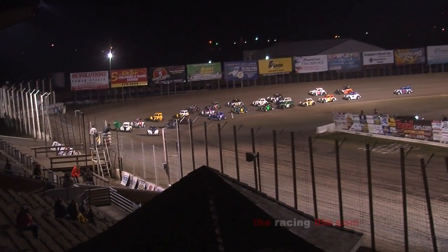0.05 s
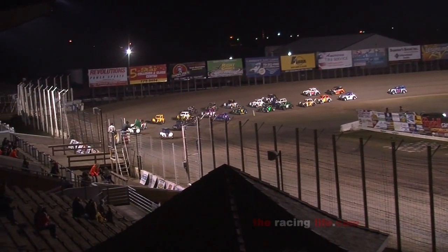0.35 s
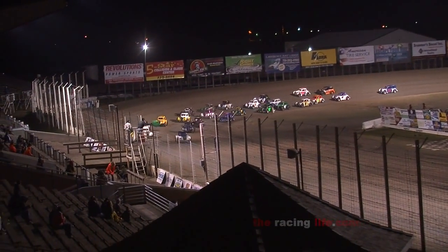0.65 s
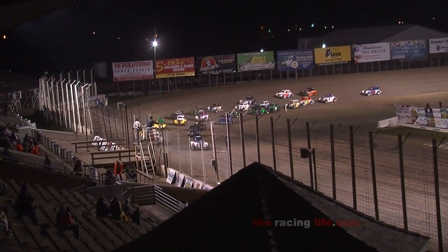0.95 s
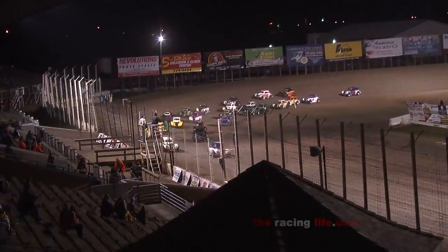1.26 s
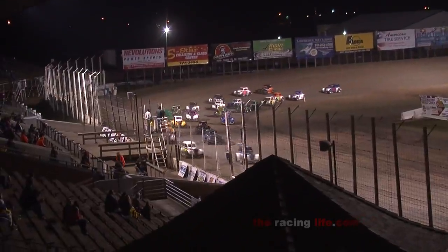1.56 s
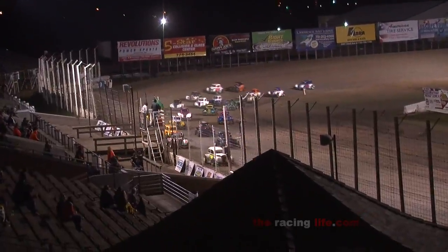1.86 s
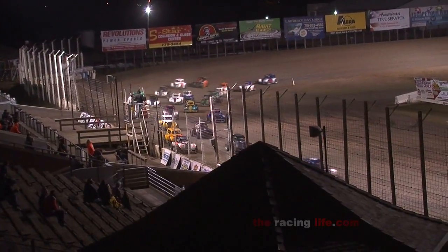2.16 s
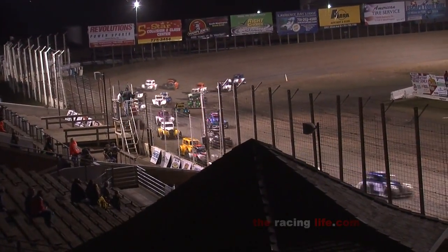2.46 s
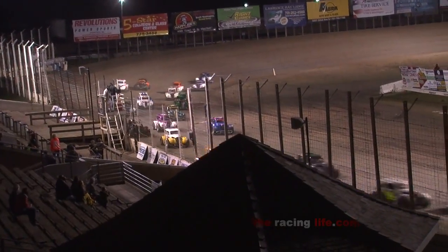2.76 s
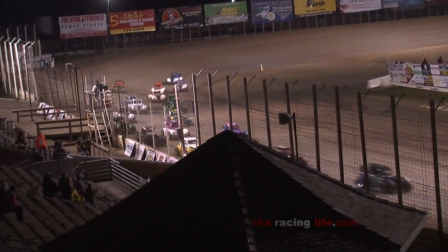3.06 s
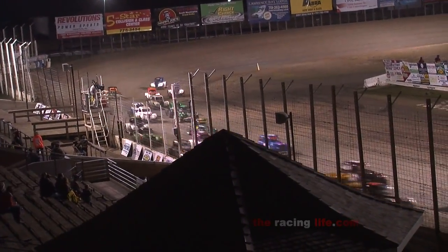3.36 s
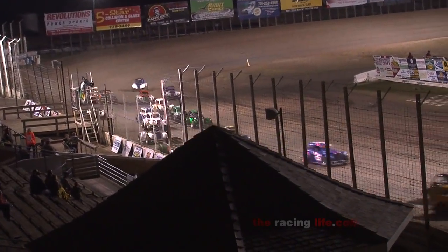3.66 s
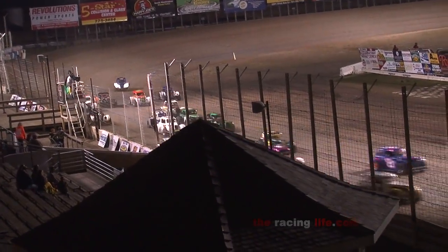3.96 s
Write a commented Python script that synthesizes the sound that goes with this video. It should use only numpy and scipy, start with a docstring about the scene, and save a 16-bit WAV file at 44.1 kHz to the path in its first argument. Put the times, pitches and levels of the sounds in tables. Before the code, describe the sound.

Race car engines roar together at a steady, loud level, heard from a grandstand. Their overlapping notes rise with the revs and drop as they pass close below, while the exhausts rasp, hiss and give a few short barks.

```python
"""A loud drone of small four-cylinder race cars accelerating out of the turn of a dirt oval.
Each exhaust sounds a harmonic series that climbs with the revs, then sinks as the car goes by.
The grandstand echoes, cars right below it blare, and the rest of the field merges into a roar.
Turbulent gas rasps and hisses over the drone, and an exhaust barks three times.
A limiter holds the din at one level and shaves its peaks."""
import sys
import numpy as np
from scipy import signal
from scipy.fft import rfft, irfft, next_fast_len
from scipy.io import wavfile
from scipy.ndimage import uniform_filter1d, map_coordinates

SR = 44100
rng = np.random.default_rng(int(sys.argv[2]) if len(sys.argv) > 2 else 0)


def bounce(signal):
    """Save signal as a 16-bit WAV file at the path given by the first command-line argument."""
    frames = np.transpose(np.atleast_2d(signal))
    limited = np.clip(frames, -1, 1)
    pcm = np.round(limited * 32767).astype(np.int16)
    wavfile.write(sys.argv[1], SR, pcm)


N = 176400
TIME_S = np.arange(N) / SR


def amp(db):
    """Decibels as an amplitude ratio."""
    return 10 ** (np.asarray(db) / 20)


def along(points, hz):
    """Interpolation of (frequency_hz, value) points on a logarithmic frequency axis."""
    point_hz, values = np.transpose(points)
    return np.interp(np.log(hz + 1), np.log(point_hz + 1), values)


def curves(rows):
    """Linear interpolation in time: one curve for each column after the first."""
    time_s, *columns = np.transpose(rows)
    return [np.interp(TIME_S, time_s, column) for column in columns]


def wobble(rate_hz):
    """Smooth random modulation: a spline through rate_hz random knots a second."""
    knots = rng.standard_normal(2048)
    at = np.arange(0, N + 64, 64)
    return np.interp(np.arange(N), at, map_coordinates(knots, [at * rate_hz / SR], mode="wrap"))


def filtered(x, response):
    """Linear filtering: the spectrum is multiplied by a frequency response."""
    size = next_fast_len(N + SR // 4)
    return irfft(rfft(x, size) * response(np.fft.rfftfreq(size, 1 / SR)), size)[:N]


def noise(spectrum, gate=1):
    """Spectral shaping: white noise is gated, coloured and scaled to rms 1."""
    x = filtered(gate * rng.standard_normal(N), lambda hz: amp(along(spectrum, hz)))
    return x / np.sqrt(np.mean(x ** 2) + 1e-20)


# Response of an exhaust pipe: frequency_hz, gain_db
PIPE_RESPONSE = [(60, -48.5), (125, -23.5), (185, -3), (240, 2.5), (305, 5), (390, 3), (550, -7), (800, -8),
                 (1500, -16.5), (3000, -30.5), (6000, -31.5), (10000, -65)]
CYLINDERS, PIPE_WIDTH_OCT = 4, 0.22
REV_WAVER, WALL_JITTER_CYCLES = .0048, .018


def engine(cycle_hz, lift_db, exhaust, flutter_db=1.5, wall_db=-8, size=2048):
    """Periodic firing drives a resonant pipe; the note interferes with its track-wall reflection."""
    even_db, odd_db, tilt_db, pipe_hz, resonance_db = exhaust
    cycles = np.cumsum(cycle_hz * (1 + REV_WAVER * wobble(45))) / SR + rng.random()
    order = np.arange(1, 48)
    firing = order % CYLINDERS == 0
    overtone = firing & (order > CYLINDERS)
    order_db = np.where(firing, 0, np.where(order % 2 == 0, even_db, odd_db))
    # The cylinders differ more towards the high orders, filling the gaps between firing harmonics.
    order_db = order_db / (1 + (order / 28) ** 2)
    order_db += tilt_db * np.log2(order / CYLINDERS)
    direct = amp(flutter_db * wobble(24)), cycles
    reflected = amp(wall_db) * wobble(21.993), cycles + WALL_JITTER_CYCLES * wobble(40)
    body, edge = np.zeros(N), np.zeros(N)
    for gain, phase in (direct, reflected):
        harmonics = amp(order_db) * np.exp(2j * np.pi * rng.random(len(order)))
        for part, chosen in ((body, ~overtone), (edge, overtone)):
            one_cycle = irfft(np.append(0, harmonics * chosen), size)
            part += gain * np.interp(phase % 1 * size, np.arange(size), one_cycle)
    peak_db = lambda hz: resonance_db * np.exp(-(np.log2((hz + 1) / pipe_hz) / PIPE_WIDTH_OCT) ** 2)
    pipe = lambda hz: amp(along(PIPE_RESPONSE, hz) + peak_db(hz))
    body, edge = filtered(body, pipe), filtered(edge, pipe)
    note = (body + amp(lift_db) * edge) / np.std(body + edge)
    puffs = (.5 + .5 * np.cos(2 * np.pi * CYLINDERS * cycles)) ** 3
    return note, puffs


# Each car's pass as heard, one list a car: time_s, cycle_hz, level_db, lift_db
# Directivity: the firing overtones lift as the pipe points at the listener.
CAR_PASSES = [
    [(0, 92.5, -31.5, 12.5), (.55, 97.5, -29.5, 4.5), (.87, 102.7, -26, 2.5), (1.2, 107.2, -30, 6),
     (1.5, 109, -38.5, -2), (1.72, 114, -30.5, 7), (1.95, 119, -30, 0.5), (2.35, 119, -31, 0.5),
     (2.55, 115, -38, -5), (4, 108, -39.5, 3)],
    [(0, 76, -30.5, -6.5), (.7, 80, -34, -10), (1.03, 83, -28.5, -2), (1.25, 85.5, -33, 2),
     (1.55, 82.2, -28.5, 3.5), (1.7, 82, -35, -4.5), (2, 84, -29.5, -1), (2.27, 85.2, -33, 10.5),
     (2.52, 87, -37.5, 7), (2.7, 86, -44, -2), (3.45, 83, -35.5, -8), (4, 81, -28, 1.5)],
    [(0, 63.3, -35, 6), (.3, 66.5, -26.5, 5.5), (.7, 68.5, -30.5, -1), (1.05, 70, -29.5, -0.5),
     (1.35, 72, -30.5, 7.5), (1.72, 75.2, -29, 4), (2, 78, -38, 0), (2.42, 81, -29, -3),
     (2.75, 78.5, -29.5, 3), (3, 74.6, -30, 5), (3.5, 68.5, -26, -2.5), (4, 61, -27.5, 1.5)],
    [(0, 70, -37, 9), (.3, 71.5, -28, -0.5), (.52, 72.5, -33, 4.5), (.62, 75.3, -32, 9), (.71, 81, -30, 0),
     (.8, 77.5, -28.5, 2), (1.05, 77, -31, -6), (1.33, 75.5, -23, -8), (1.5, 74.8, -30.5, -4),
     (2, 72.7, -25.5, -0.5), (2.27, 67.3, -32.5, 1), (2.75, 57, -27.5, 1), (3.15, 58.2, -24.5, -7.5),
     (3.3, 57, -31, 0.5), (4, 54, -33.5, -2.5)],
    [(0, 88, -34, -9), (1.1, 94.3, -37.5, 1), (1.4, 97.5, -32.5, 2.5), (1.75, 101.5, -31.5, -4),
     (2.05, 104.5, -25.5, 0), (2.45, 100, -32, -2), (2.8, 94.5, -41.5, 3), (3.5, 90, -42.5, 1.5)],
    [(0, 56, -41.5, -3), (2.2, 58, -34.5, -5.5), (2.6, 63.7, -29.5, -4.5), (2.85, 62.2, -27, 2.5),
     (3.2, 66, -37, 14), (3.4, 63, -29, 4), (3.65, 61, -33.5, 1.5), (4, 60, -35.5, 1)],
    [(0, 62.2, -36.5, -2), (.25, 67.5, -32.5, 4.5), (.5, 68, -35.5, 2.5), (.8, 71.2, -35.5, 4.5),
     (1.35, 78, -29.5, 0), (1.8, 80, -30.5, -2.5), (2.7, 74, -34, -4), (2.9, 74, -30.5, 2),
     (3.3, 77.8, -38.5, 4.5), (3.75, 77.6, -29.5, 1), (3.93, 77.2, -22.5, -5)],
]
# Each car's exhaust: even_orders_db, odd_orders_db, tilt_db_per_octave, pipe_hz, resonance_db
EXHAUST_TIMBRES = [(-2, -9, -1.5, 470, 6.5), (-11.5, -11.5, 0.5, 680, 3), (-7, -9, -1, 820, 2),
                   (-13.5, -15, -2, 305, 0.5), (-4.5, -6.5, 1, 320, -1), (-19, -21, -3.5, 510, 1.5),
                   (-15.5, -9.5, -0.5, 860, 5.5)]


def pack(throb_db=2, throb_hz=30):
    """Superposition: the near cars' notes add, throbbing irregularly; their puffs form a pulsing flow."""
    notes, flow = np.zeros(N), np.zeros(N)
    for rows, exhaust in zip(CAR_PASSES, EXHAUST_TIMBRES):
        cycle_hz, level_db, lift_db = curves(rows)
        note, puffs = engine(cycle_hz, lift_db, exhaust)
        notes += amp(level_db) * note
        flow += amp(level_db) ** 2 * puffs
    mean_flow = uniform_filter1d(flow, SR // 10)
    return notes * amp(throb_db * wobble(throb_hz)), np.sqrt(flow / mean_flow)


# Reverberation time of the grandstand: frequency_hz, t60_s
STAND_DECAY = [(150, 0.82), (1000, 0.47), (8000, 0.52)]


def grandstand_echo(notes):
    """Reverberation: dense reflections decay exponentially, faster in the treble than in the bass."""
    hz, time_s, spectra = signal.stft(rng.standard_normal(SR // 2), SR, nperseg=256)
    decay = amp(-60 * time_s / along(STAND_DECAY, hz)[:, None])
    _, tail = signal.istft(spectra * decay, SR, nperseg=256)
    return signal.fftconvolve(notes, tail / np.linalg.norm(tail))[:N]


# Envelope of the cars passing side-on: time_s, level_db
BLARE_ENVELOPE = [(0, -31.5), (1.8, -49), (2.3, -29.5), (2.8, -30), (3.3, -28.5), (4, -25.5)]
# Spectrum of their blare: frequency_hz, density_db
BLARE_SPECTRUM = [(60, -44), (150, -26.5), (235, 2.5), (300, 2.5), (380, -11.5), (500, -0.5), (600, -3),
                  (750, -12), (1200, -19), (3000, -33.5), (8000, -67.5)]


def blare():
    """Spectral smearing: right below the stand, the quick fall in pitch blurs notes into noise bands."""
    level_db, = curves(BLARE_ENVELOPE)
    return amp(level_db) * noise(BLARE_SPECTRUM)


# Spectrum of the distant cars: frequency_hz, density_db
ROAR_SPECTRUM = [(25, -31), (70, -33.5), (110, -23), (160, -17.5), (230, 0), (300, -2), (380, -7),
                 (520, -6.5), (750, -13.5), (1100, -15.5), (1600, -21), (2500, -30), (5000, -39),
                 (10000, -84)]


def roar(level_db=-26.5, swell_db=1):
    """Incoherent summation: the rest of the field, blurred by distance, merges into noise."""
    return amp(level_db + swell_db * wobble(8)) * noise(ROAR_SPECTRUM)


# Spectra of exhaust rasp and of the nearest cars' tyre and exhaust hiss: frequency_hz, density_db
RASP_SPECTRUM = [(200, -21.5), (700, 6.5), (1400, 10.5), (2200, 4.5), (3400, -2), (5000, -19.5),
                 (5800, -26.5), (7000, -43), (8800, -51.5), (10300, -61.5), (12300, -56), (15500, -70.5)]
HISS_SPECTRUM = [(1000, -33.5), (3000, 2.5), (4000, 2), (5000, -0.5), (5800, -6.5), (7000, -9.5),
                 (8800, -17.5), (9600, -23), (10400, -34), (11400, -38.5), (12400, -33.5), (13500, -45),
                 (16000, -49.5)]
# Their envelopes: time_s, relative_level_db
RASP_ENVELOPE = [(0, 2), (.3, 1), (.45, 1), (.58, -3), (.73, -2), (.77, 3), (.82, -1.5), (.93, -4),
                 (1, -1.5), (1.35, 1), (1.45, -1.5), (1.52, 3.5), (1.87, 3), (1.9, -3), (1.96, 0),
                 (2.32, 2), (2.35, -1.5), (2.75, -3), (3.05, 1), (3.25, -1), (3.31, 1.5), (3.55, -1),
                 (3.72, 1), (4, 2.5)]
HISS_ENVELOPE = [(0, -64), (.7, -63.5), (.78, -61), (1.45, -59), (1.48, -53.5), (1.875, -52.5),
                 (1.895, -57), (1.935, -57), (1.95, -54.5), (2.325, -53), (2.34, -59), (2.75, -59),
                 (3.25, -57.5), (3.32, -55.5), (3.55, -56.5), (3.75, -55), (4, -52)]


def rasp_and_hiss(flow, rasp_db=-34, hiss_db=10, flicker_db=.9, chop_depth=0.47):
    """Amplitude modulation: the firings partly chop the noise of turbulent gas and a brighter hiss."""
    rasp_swell_db, = curves(RASP_ENVELOPE)
    hiss_swell_db, = curves(HISS_ENVELOPE)
    gate = 1 + chop_depth * (flow - 1)
    rasp = amp(rasp_db + rasp_swell_db) * noise(RASP_SPECTRUM, gate)
    hiss = amp(hiss_db + hiss_swell_db) * noise(HISS_SPECTRUM, gate)
    return (rasp + hiss) * amp(flicker_db * wobble(45))


# Sharp barks from an exhaust: start_s, length_s, level_db
BARK_EVENTS = [(.628, .012, -38), (3.348, .018, -32), (3.815, .02, -35)]
# Their spectrum: frequency_hz, density_db
BARK_SPECTRUM = [(300, -9), (1200, 4.5), (3500, -6), (5000, -15), (8500, -26.5), (10500, -43),
                 (16000, -56.5)]


def barks(attack_s=0.0028, release_s=0.0082):
    """Broadband transients: each burst of hot gas rises quickly, holds and decays exponentially."""
    envelope = np.zeros(N)
    for start_s, length_s, level_db in BARK_EVENTS:
        rise = np.clip((TIME_S - start_s) / attack_s, 0, 1)
        fall = np.exp(-np.maximum(TIME_S - start_s - length_s, 0) / release_s)
        envelope += amp(level_db) * rise * fall
    return envelope * noise(BARK_SPECTRUM)


# Brief surges (+) and dips (-) of the drone: centre_s, change_db
DRONE_SWINGS = [(.93, -5), (1.335, 4), (1.37, -4), (1.41, 4), (1.45, -8), (1.64, -5), (1.78, -4),
                (1.905, -6), (3.16, 4), (3.25, -8), (3.855, -5)]


def swings(half_width_s=.018):
    """Gain modulation: the drone's level surges or dips along short Gaussian curves."""
    return amp(sum(change_db * np.exp(-((TIME_S - centre_s) / half_width_s) ** 2)
                   for centre_s, change_db in DRONE_SWINGS))


def scene(echo_db=-5.5):
    """Superposition: near cars, echo, blare and roar form the drone, with rasp and barks over it."""
    notes, flow = pack()
    drone = notes + amp(echo_db) * grandstand_echo(notes) + blare() + roar()
    return (swings() * drone + rasp_and_hiss(flow) + barks())[None]


def record(dry, drive_db=-1.5, threshold=.235, release_s=.06, ceiling=.195, top_hz=15800):
    """Peak limiting with fast attack and gradual release, then clipping of positive peaks and low-pass."""
    x = amp(drive_db) * dry[0]
    excess_nepers = np.log(np.maximum(np.abs(x) / threshold, 1) + 1e-9)
    # The gain reduction jumps to each new peak and relaxes exponentially.
    fade = TIME_S / release_s
    reduction = np.exp(np.maximum.accumulate(np.log(excess_nepers) + fade) - fade)
    limited = x * np.exp(-uniform_filter1d(reduction, size=90))
    clipped = np.minimum(limited, ceiling)
    return filtered(clipped, lambda hz: hz < top_hz)[None]


dry = scene()
out = record(dry)
bounce(out)
```